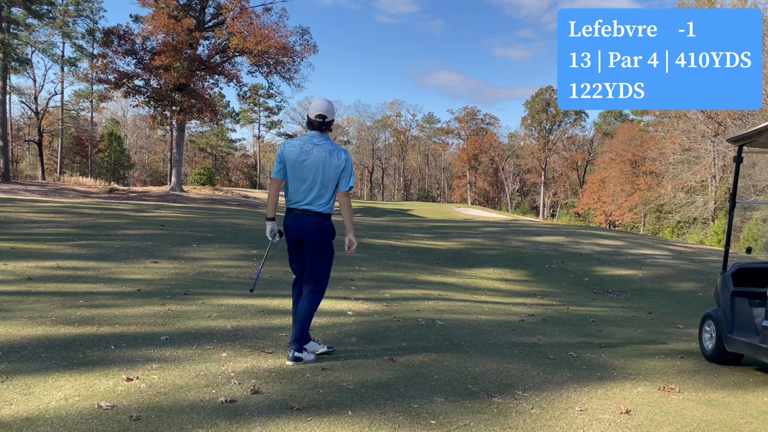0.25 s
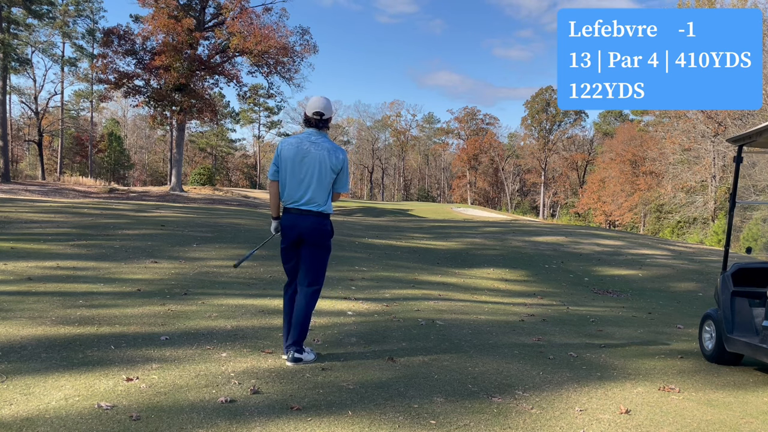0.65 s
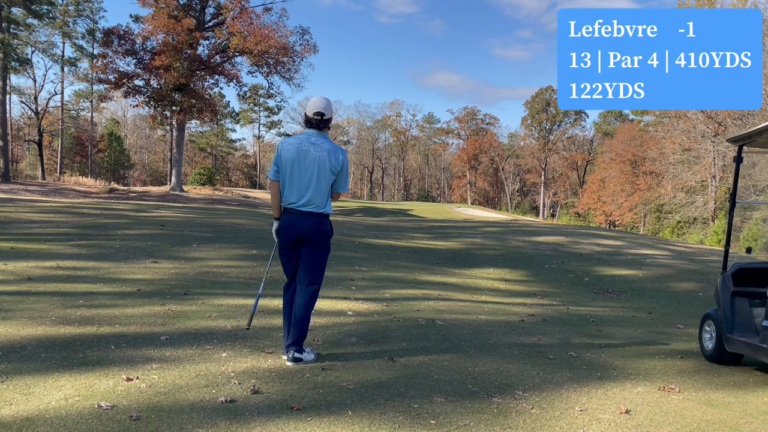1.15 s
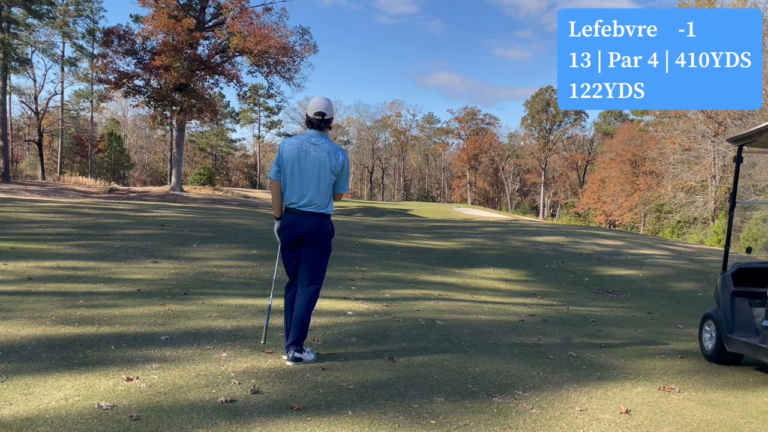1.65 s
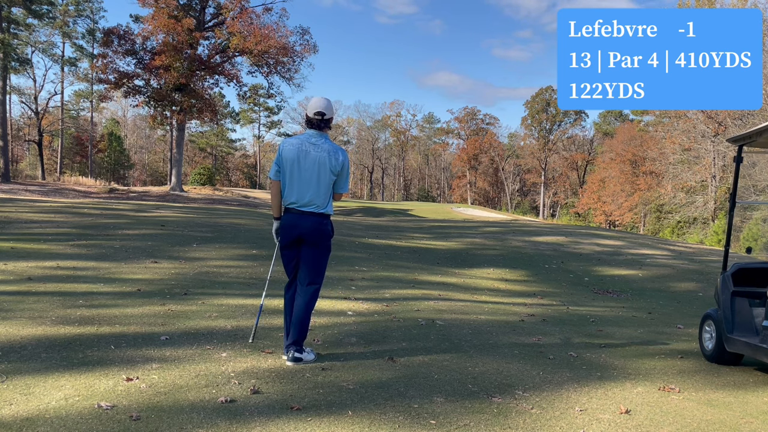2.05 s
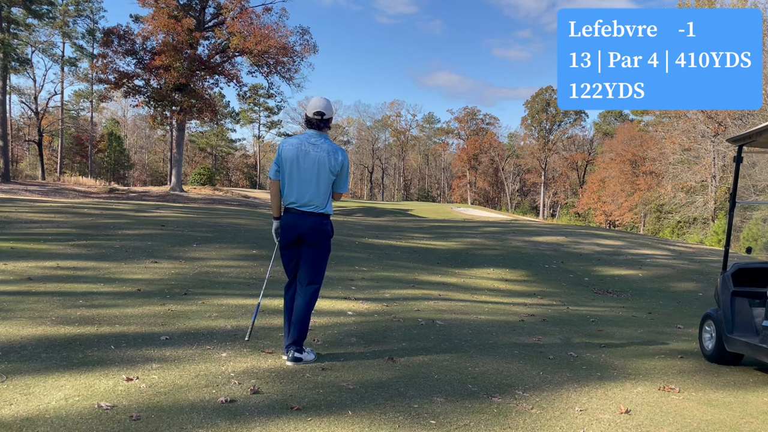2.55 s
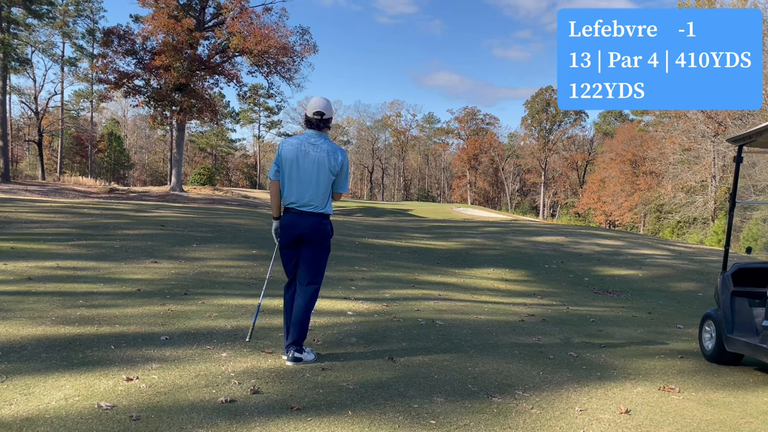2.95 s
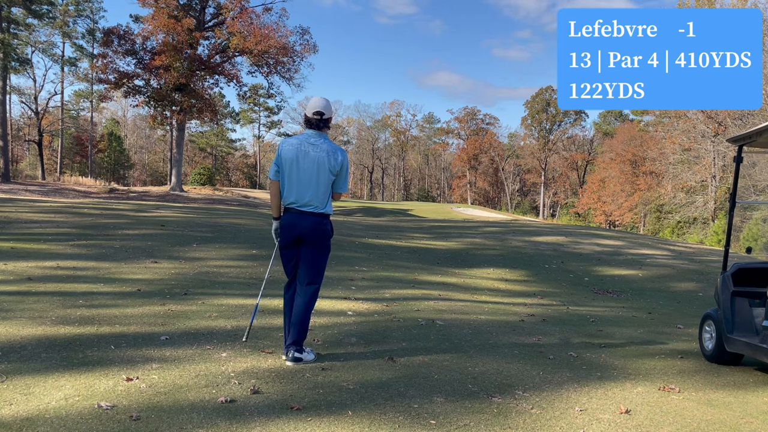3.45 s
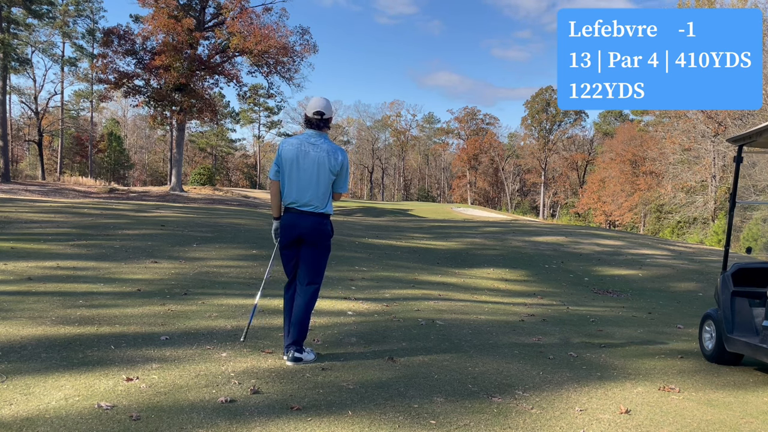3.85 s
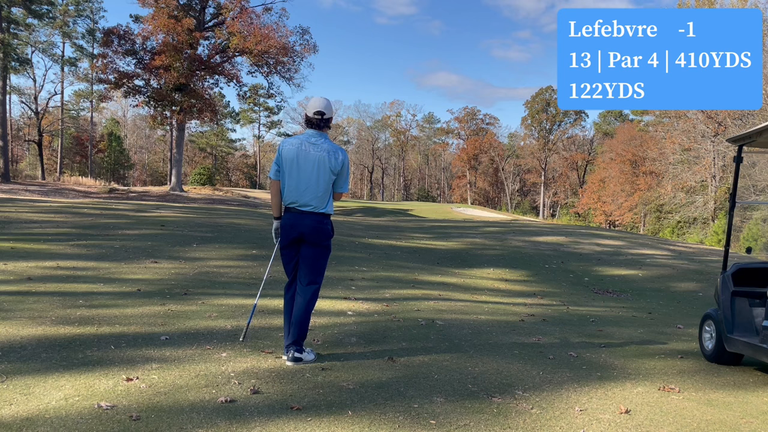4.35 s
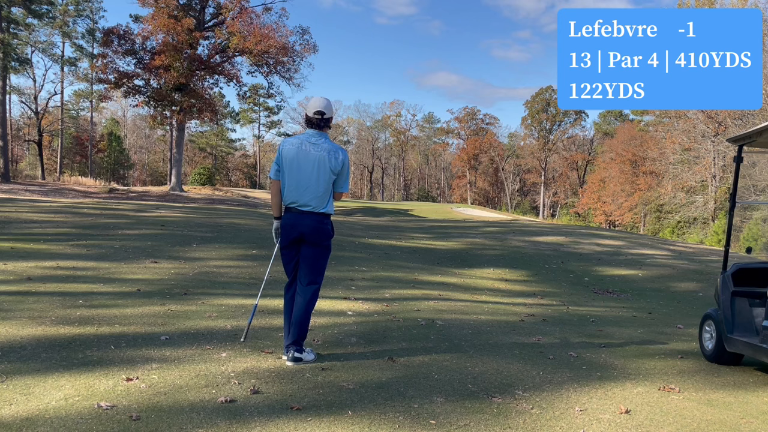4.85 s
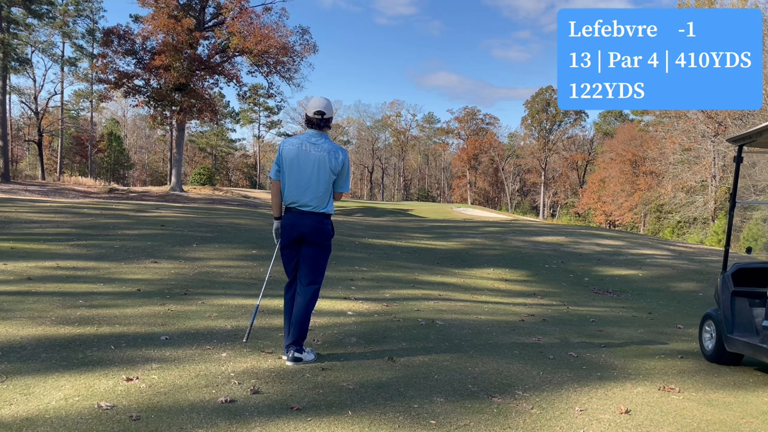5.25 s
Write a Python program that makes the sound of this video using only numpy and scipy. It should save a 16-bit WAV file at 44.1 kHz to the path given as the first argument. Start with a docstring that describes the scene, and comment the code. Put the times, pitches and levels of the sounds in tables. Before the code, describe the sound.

On an open lawn edged by trees, a faint swish and a quick crunch of dry leaves come first, with a short low trill. High songbird calls follow, one loud near the start. A small engine putters throughout, sagging slightly, then gaining speed with rattles and hard ticks. Soft low wind rumble and distant murmur lie beneath. A stereo microphone hears it from some distance, with no club strike.

```python
"""A small engine drones across an open lawn: pulse multiples plus running noise, over far murmur, rumble and wind.
A thin swish, then crunches in dry leaves (noise bursts) and a short low trill (double blips) open the scene.
From 0.7 s songbirds in the trees give thin high calls (gliding near-sines with a soft echo), a loud one near 0.9 s.
The engine sags a little, then gains speed; loose parts buzz (shaken resonances), with hard ticks from 1.55 s.
Two more loud bird calls come near 4 s, and the engine ends at its fastest."""
import sys
import numpy as np
from scipy import signal
from scipy.fft import rfft, irfft
from scipy.io import wavfile
from scipy.ndimage import uniform_filter1d

SR = 44100
rng = np.random.default_rng(int(sys.argv[2]) if len(sys.argv) > 2 else 0)


def file_out(sig):
    """Save sig as 16-bit WAV at sys.argv[1]."""
    # one column per channel
    cols = np.atleast_2d(sig).T
    # limit, then scale
    lim = np.clip(cols, -1, 1)
    pcm = np.round(lim * 32767).astype(np.int16)
    wavfile.write(sys.argv[1], SR, pcm)


N = 242991

# engine speed: time_s, firings_per_s
ENGINE_SPEED = [(0.0, 30.31), (0.3, 29.58), (0.6, 30.06), (0.85, 28.98), (1.05, 29.73), (1.3, 29.39),
                (1.55, 30.49), (1.8, 31.71), (2.05, 32.53), (2.4, 32.7), (2.8, 33.24), (3.2, 33.15),
                (3.6, 33.82), (4.0, 33.97), (4.4, 34.87), (4.75, 35.13), (5.1, 36.21), (5.51, 37.73)]


def engine_firings():
    """Firing phase in turns, integrated from the firing rate; the hardest tick falls on a firing."""
    firings_per_s, = in_time(ENGINE_SPEED)
    turns = np.cumsum(firings_per_s) / SR
    hardest_s = max(KNOCKS, key=lambda row: row[1])[0]
    return turns - turns[round(hardest_s * SR)], firings_per_s


# drone before exhaust gain: time_s, level_db (at multiple 2), slope_db_per_octave
DRONE_LEVEL = [(0, -52, 2), (.4, -51.5, 0), (.75, -53, 2.5), (.93, -48, -1), (1.4, -44, -4),
               (1.67, -41, -8), (2.0, -42.5, -5.5), (2.13, -44, -3), (2.35, -42.5, -4), (2.7, -42.5, -4),
               (3.4, -42, -6), (4.0, -46, 0.5), (4.4, -45.5, -2), (5.0, -45.5, -2.5), (5.51, -46.5, -6)]
# exhaust gain on multiples 1-6: pitch_hz, gain_db
EXHAUST_GAIN = [(29, -31.5), (33, -31.5), (38, -10), (55, 1.5), (75, 2.5), (90, -1), (102, 0.5),
                (112, -2.5), (125, -1.5), (138, 0.5), (154, -2.5), (164, -19.5), (172, -11.5), (182, -19),
                (200, -29.5), (225, -17)]
# weak upper multiples: multiple, level_db
WEAK_MULTIPLES = [(7, -78), (8, -76.5), (10, -74.5)]
PULSE_LEAD_TURNS = .056   # pulse ahead of rattle
HUNTING_TURNS = .006   # spread of early or late firing
PULSE_SPREAD_RAD = .55   # lag of multiple k, times k squared


def drone(turns, firings_per_s):
    """Low multiples of the firing rate locked into one pulse, each wavering on its way through the air."""
    level_db, slope_db = in_time(DRONE_LEVEL)
    multiples = [(k, level_db + slope_db * np.log2(k / 2) + at_hz(EXHAUST_GAIN, k * firings_per_s))
                 for k in range(1, 7)]
    turns = turns + PULSE_LEAD_TURNS + HUNTING_TURNS * drift(12.0)
    out = np.zeros(N)
    for k, multiple_db in multiples + WEAK_MULTIPLES:
        gain = np.sqrt(2) * from_db(multiple_db + .7 * drift(6.2))   # sqrt 2: rms to peak
        phase_rad = 2 * np.pi * k * turns - PULSE_SPREAD_RAD * k ** 2 + 0.054 * drift(7.0)
        out -= gain * np.cos(phase_rad)
    return out


# running noise over the lawn: time_s, level_db
RUNNING_LEVEL = [(0, -68.5), (.55, -64.5), (.8, -67.5), (1.4, -65), (1.7, -62), (3.1, -60.5), (4.9, -60),
                 (5.51, -62)]
# its spectrum: freq_hz, relative_db_per_hz
RUNNING_COLOUR = [(240, -36.5), (400, -10), (502, -8), (729, 3), (1110, -1.5), (1340, 0), (2040, -4),
                  (3180, -9.5), (5010, -22.5), (5610, -33.5), (6000, -42.5), (7800, -60.5), (13200, -120)]


def rush(turns, rush_db):
    """Broad running noise that swells a little with each firing."""
    throb = 1 + 0.055 * np.cos(2 * np.pi * turns)
    return from_db(rush_db + .5 * drift(15)) * throb * coloured(RUNNING_COLOUR)


# level of each part at rest, relative to running noise: part -> relative_db
REST_DB = {"low": -21, "middle": -17, "high": -23, "top": -34}
# spells of harder rattle: part, middle_s, length_s, peak_level_db
RATTLE_SPELLS = [("low", 2.4, 0.83, -76.5), ("low", 4.4, 0.093, -69), ("low", 3.79, 0.23, -66.5),
                 ("low", 4.7, 1.0, -73.5), ("middle", 1.81, 1, -73), ("middle", 3.26, 0.38, -67.5),
                 ("middle", 3.74, 1, -72), ("high", 1.4, 0.24, -77.5), ("high", 2.805, 0.47, -72.5),
                 ("top", 1.9, .1, -87), ("top", 2.7, .2, -84.5), ("top", 3.5, 0.91, -88)]


def rattle_db(part, rush_db):
    """A loose part buzzes with the running noise and harder in its spells; powers add."""
    power = from_db(rush_db + REST_DB[part]) ** 2
    for name, middle_s, length_s, peak_db in RATTLE_SPELLS:
        if name == part:
            power = power + (from_db(peak_db) * hump(middle_s, length_s)) ** 2
    return 10 * np.log10(power)


def shaken(turns, modes, level_db):
    """Noise in a pipe or loose part, harder just after each firing: strong then weak, never alike."""
    firing = np.floor(turns).astype(int) - int(np.floor(turns[0]))
    chance = np.minimum(rng.standard_normal(400), 1)[firing]
    strength = from_db(2.5 * (-1) ** firing + 3.7 * chance)
    shake = .28 + 0.61 * strength * np.exp(-(turns % 1) / .18)
    buzz = np.zeros(N)
    for pitch_hz, width_hz in modes:
        ring = resonate(shake * rng.standard_normal(N), pitch_hz, width_hz)
        buzz += rms_one(ring) * from_db(3.3 * drift(8))
    return from_db(level_db) * rms_one(buzz)


# exhaust pipe resonances: pitch_hz, width_hz
PIPE_MODES = [(734.6, 39), (376.4, 84)]
# loose-part resonances, low to top: pitch_hz, width_hz
LOW_MODES = [(2200, 550), (2650, 500)]
MIDDLE_MODES = [(3150, 330), (3450, 420)]
HIGH_MODES = [(4050, 400), (4350, 440)]
TOP_MODES = [(5100, 260), (5900, 290)]
PIPE_REL_DB, PIPE_FOLLOWS = -7.5, 2.3   # re mean running noise; multiple of its swing


def pipe_and_rattles(turns, rush_db):
    """Exhaust pipe and four loose parts, all shaken by the firings."""
    mean_db = rush_db.mean()
    out = shaken(turns, PIPE_MODES, mean_db + PIPE_REL_DB + PIPE_FOLLOWS * (rush_db - mean_db))
    for part, modes in [("low", LOW_MODES), ("middle", MIDDLE_MODES), ("high", HIGH_MODES), ("top", TOP_MODES)]:
        out = out + shaken(turns, modes, rattle_db(part, rush_db))
    return out


# hardest ticks of the loose parts: start_s, peak_db, pitch_hz
KNOCKS = [(1.553, -62, 3140), (1.6188, -60, 3100), (1.6837, -59, 3130), (1.7455, -63, 3240),
          (1.8408, -59, 2520), (1.8733, -60, 2540), (1.9037, -62, 3450), (1.9356, -57, 3240),
          (1.9965, -56, 3250), (2.1511, -59, 2740), (2.2434, -59, 3110), (2.4255, -62, 2610),
          (2.4864, -59, 2500), (2.5198, -53.5, 2290), (2.7303, -57, 2470), (2.7907, -58, 4220),
          (2.8171, -56.5, 2500), (2.8835, -51, 2100), (2.9408, -55.5, 2540), (2.9997, -61, 2980),
          (3.0321, -58, 3380), (3.1504, -59, 3170), (3.1803, -58, 3380), (3.2107, -50.5, 3170),
          (3.2711, -59, 3190), (3.301, -60.5, 3110), (3.3609, -58, 2860), (3.3908, -57, 3260),
          (3.4801, -61, 2620), (3.5689, -55, 3170), (3.5973, -57, 2700), (3.6283, -58, 3400),
          (3.6567, -61, 3380), (3.6866, -55, 2710), (3.7176, -57, 2370), (3.7465, -60, 2650),
          (3.7764, -55, 2380), (3.8358, -59, 2760), (3.8652, -56, 2420), (4.0124, -55.5, 2160),
          (4.0448, -56, 2910), (4.2743, -60, 2790), (4.4758, -60, 2940), (4.5058, -57.5, 2900),
          (4.5921, -61, 2930), (4.647, -57, 2290), (2.945, -71, 5900), (3.003, -70, 5900),
          (4.026, -66, 5900), (4.027, -60, 5150), (5.401, -66, 5200), (4.133, -58.5, 4150),
          (5.4, -68, 6160)]
TICK_WIDTH, TICK_PARTNER = .065, 1.1   # width / pitch; pitch ratio of second mode


def hard_ticks():
    """Single knocks ringing briefly at their own pitch and in a second mode of chance strength."""
    out, knock = np.zeros(N + SR), signal.unit_impulse(600)
    chance = rng.standard_normal((len(KNOCKS), 2))
    for (start_s, peak_db, pitch_hz), (share, side) in zip(KNOCKS, chance):
        width_hz = TICK_WIDTH * pitch_hz
        partner_hz = pitch_hz * TICK_PARTNER ** np.sign(side)
        ring = resonate(knock, pitch_hz, width_hz)
        ring = ring + from_db(-5 + 2 * share) * resonate(knock, partner_hz, width_hz)
        first = round(start_s * SR)
        out[first:first + len(ring)] += from_db(peak_db) * ring / np.abs(ring).max()
    return out[:N]


ATTACK_S, RELEASE_S = 0.0054, 0.0023


def note(start_s, pitch_hz, level_db, quaver_hz):
    """One near-sine along a pitch path."""
    out, first, t = np.zeros(N), round(start_s * SR), np.arange(len(pitch_hz)) / SR
    edge = np.clip(np.minimum(t / ATTACK_S, (t[-1] - t) / RELEASE_S), 0, 1)
    unsteady_hz = pitch_hz + quaver_hz[first:first + len(t)]
    tone = np.sin(2 * np.pi * np.cumsum(unsteady_hz) / SR)
    out[first:first + len(t)] = edge * from_db(level_db) * tone
    return out


# bird levels in these tables are before flutter and pan
# glides that slow toward their end: start_s, length_s, from_hz, to_hz, level_db
BIRD_GLIDES = [(0.677, 0.08, 6450, 7330, -83.5), (.75, 0.085, 7400, 7950, -83.5),
               (.84, .03, 7880, 7800, -84.5), (0.805, 0.12, 6520, 7130, -88),
               (0.888, 0.029, 7200, 7400, -77), (0.948, 0.054, 7580, 7700, -81),
               (0.996, 0.028, 7950, 8500, -85), (1.037, 0.083, 6400, 7250, -78.5),
               (1.177, 0.013, 7300, 5200, -74), (1.185, 0.036, 6500, 6970, -80.5),
               (1.196, 0.071, 7250, 7330, -88), (1.836, 0.02, 8450, 7700, -77.5),
               (2.487, 0.025, 7500, 6750, -73), (2.502, 0.031, 6720, 7450, -79),
               (2.475, .03, 8200, 7950, -85), (2.892, 0.021, 6700, 6550, -87),
               (2.905, .03, 7200, 6950, -85.5), (3.575, 0.031, 7000, 7800, -89),
               (3.621, 0.028, 6800, 6800, -78.5), (4.21, 0.038, 7850, 7860, -80.5),
               (4.265, 0.04, 7950, 7900, -81), (4.718, 0.09, 7880, 7940, -81.5),
               (4.972, 0.076, 8050, 7750, -81.5), (5.136, 0.025, 6500, 7500, -78)]
# hooks that bend to a turn, then break away:
# start_s, before_turn_s, after_turn_s, from_hz, turn_hz, end_hz, start_level_db, turn_level_db
BIRD_HOOKS = [(1.115, 0.049, .03, 7700, 8100, 7600, -86, -83),
              (3.716, 0.028, .03, 6300, 7170, 5800, -91, -82),
              (4.765, .105, 0.046, 7880, 8030, 7600, -93, -79.5),
              (5.035, 0.026, 0.078, 7850, 8040, 7830, -90, -79.5)]
# three loud calls that climb and plunge, one list each: time_s, pitch_hz
LOUD_CALL_PITCH = [
    [(.864, 6200), (.878, 6480), (.9, 6700), (.915, 7060), (.926, 7080), (.94, 6700), (.947, 6100),
     (.953, 4500)],
    [(3.998, 6300), (4.012, 6600), (4.028, 6750), (4.045, 7150), (4.1, 7560), (4.147, 7890), (4.153, 7500),
     (4.159, 6600)],
    [(4.217, 5950), (4.232, 6250), (4.258, 6480), (4.278, 6990), (4.312, 7170), (4.328, 6880),
     (4.335, 6000), (4.343, 4800)],
]
# their levels: time_s, level_db
LOUD_CALL_LEVEL = [
    [(.864, -81), (.885, -60.5), (.905, -66), (.925, -60.5), (.943, -61), (.953, -84)],
    [(3.998, -80), (4.03, -69), (4.08, -73.5), (4.145, -70), (4.153, -82), (4.159, -89)],
    [(4.217, -82), (4.235, -71), (4.255, -73), (4.275, -68.5), (4.335, -65), (4.343, -74)],
]
GLIDE_EASE, BREAK_POWER = 1.6, 3.6   # exponents of the pitch laws
BREAK_FADE_DB = -6   # a hook weakens as it breaks away
QUAVER_HZ, BIRD_PAN_DB = 30, 9.5   # spread of pitch (half in loud calls); left over right
ECHO_DB, ECHO_RISE_S, ECHO_T60_S = -32, .012, .26


def birds():
    """Gliding, fluttering near-sines; the trunks answer softly and a little late with a blurred echo."""
    song, quaver_hz = np.zeros(N), QUAVER_HZ * drift(55)
    for start_s, length_s, from_hz, to_hz, level_db in BIRD_GLIDES:
        left = np.linspace(1, 0, round(length_s * SR))
        song += note(start_s, to_hz + (from_hz - to_hz) * left ** GLIDE_EASE, level_db, quaver_hz)
    for start_s, before_s, after_s, from_hz, turn_hz, end_hz, start_db, turn_db in BIRD_HOOKS:
        bend = np.cos(np.linspace(0, np.pi / 2, round(before_s * SR))) ** 2
        away = np.linspace(0, 1, round(after_s * SR)) ** BREAK_POWER
        pitch_hz = turn_hz + np.r_[(from_hz - turn_hz) * bend, (end_hz - turn_hz) * away]
        level_db = turn_db + np.r_[(start_db - turn_db) * bend, BREAK_FADE_DB * away]
        song += note(start_s, pitch_hz, level_db, quaver_hz)
    for pitch, level in zip(LOUD_CALL_PITCH, LOUD_CALL_LEVEL):
        t = np.arange(pitch[0][0], pitch[-1][0], 1 / SR)
        pitch_hz = uniform_filter1d(np.interp(t, *np.transpose(pitch)), size=200, mode="nearest")
        song += note(t[0], pitch_hz, np.interp(t, *np.transpose(level)), quaver_hz / 2)
    flutter = from_db(2.4 * drift(79))
    panned = song * flutter * from_db([[BIRD_PAN_DB / 2], [-BIRD_PAN_DB / 2]])
    age_s = np.arange(SR // 2) / SR
    decay = from_db(-60 * age_s / ECHO_T60_S) * np.minimum(age_s / ECHO_RISE_S, 1)
    tail = rng.standard_normal((2, SR // 2)) * decay
    echo = signal.fftconvolve(panned, tail, axes=1)[:, :N]
    return left_first(panned) + from_db(ECHO_DB + 2.4 * drift(150)) * echo


# double notes, level before the husky noise: start_s, level_db
TRILL_NOTES = [(0.42, -57), (0.4795, -59.5), (0.5392, -60.5), (0.6018, -62)]
TRILL_ROUGH, TRILL_TAIL_DB = .9, -4   # share of husky noise; blur after each note


def trill():
    """Each double note is a husky high blip, then a lower one that bends upward, blurred after."""
    out, t = np.zeros(N), np.arange(round(0.03 * SR)) / SR
    high = 0.57 * np.sin(2 * np.pi * 2500 * t) * np.exp(-((t - .004) / 0.0033) ** 2)
    low_hz = 1700 + 30000 * t
    low = np.sin(2 * np.pi * np.cumsum(low_hz) / SR) * np.exp(-((t - .011) / 0.0046) ** 2)
    for start_s, level_db in TRILL_NOTES:
        first = round(start_s * SR)
        out[first:first + len(t)] += from_db(level_db) * (high + low)
    out = out * (1 + TRILL_ROUGH * drift(170))
    blur = rng.standard_normal(4000) * from_db(-60 * np.arange(4000) / SR / .09)   # T60 0.09 s
    return out + from_db(TRILL_TAIL_DB) * signal.fftconvolve(out, blur / np.linalg.norm(blur))[:N]


# crunches in dry leaves, envelope before the noise gains: start_s, envelope_peak_db, rise_s
LEAF_CRUNCHES = [(.3125, -57, 0.0009), (0.401, -48, 0.0022), (0.404, -43, 0.002), (0.413, -51, 0.0018),
                 (.421, -51, 0.0019), (.433, -58, 0.0023), (0.447, -54, 0.001), (.478, -62, .003),
                 (0.4883, -48, 0.00077)]
# crunch spectrum: freq_hz, relative_db_per_hz
LEAF_COLOUR = [(500, -26), (1200, -10), (2400, -4), (3300, -2), (4400, -23), (5250, 4), (5800, -4),
               (6500, -13), (7500, -4), (8600, 14), (10000, 0), (11500, -6.5), (14000, 1), (15700, -2)]
# each port's own share: freq_hz, relative_db_per_hz
LEAF_SCATTER = [(500, -24), (2400, -7), (6500, -9), (10000, -2), (11800, -14), (12600, -50)]
SCATTER_DB = -10   # before a further 0.31 gain
SETTLE_DB, SETTLE_T60_S = -39, 0.25   # rustle re crunch envelope
SWISH_MIDDLE_S, SWISH_LENGTH_S, SWISH_DB = .09, .2, -83.5


def leaves():
    """Each crunch is a burst of bright noise; a thin rustle lingers, and a thin swish comes first."""
    t = np.arange(N) / SR
    rustle = from_db(SWISH_DB) * hump(SWISH_MIDDLE_S, SWISH_LENGTH_S)
    for start_s, peak_db, rise_s in LEAF_CRUNCHES:
        settle_db = peak_db + SETTLE_DB - 60 * np.maximum(t - start_s, 0) / SETTLE_T60_S
        rustle = rustle + (t > start_s) * from_db(settle_db)
    thin = coloured([(8000, -41.5), (11000, -10), (13500, -4.5), (15500, -17)])
    crackle = bursts(LEAF_CRUNCHES)
    crunch = crackle * ragged(coloured(LEAF_COLOUR)) * 0.52
    sound = crunch + rustle * from_db(0.6 * drift(44)) * thin
    scatter = np.array([coloured(LEAF_SCATTER) for port in range(2)])
    return left_first([sound, sound]) + from_db(SCATTER_DB) * crackle * scatter * 0.31


def bursts(rows):
    """Envelope of bursts that swell fast and die."""
    t, out = np.arange(N) / SR, np.zeros(N)
    for start_s, peak_db, rise_s in rows:
        age = np.maximum(t - start_s, 0) / max(rise_s, .0003)
        out += from_db(peak_db) * age * np.exp(1 - age)
    return out


CRACKLE_DB = 3.5   # spread of unevenness, band by band


def ragged(x):
    """Each band of a sound flickers on its own."""
    edges_hz = [300, 2000, 4000, 6000, 8000, 11000, 13500, 17000]
    out = np.zeros(N)
    for band_hz in zip(edges_hz, edges_hz[1:]):
        band_pass = signal.butter(2, band_hz, "band", fs=SR, output="sos")
        out += from_db(CRACKLE_DB * drift(150)) * signal.sosfilt(band_pass, x)
    return out


# wind spectrum: freq_hz, relative_db_per_hz
WIND_COLOUR = [(15, -26.5), (35, -5.5), (60, 6.5), (90, -2), (150, -13.5), (400, -100)]
WIND_DB = -59   # before gusts and lumps


def wind():
    """Lumpy low pressure: gusts in common, lumps and noise each port's own."""
    gusts_db = 1.5 * drift(2)
    lumps_db = [1.5 * drift(5) for port in range(2)]
    return np.array([from_db(WIND_DB + gusts_db + own_db) * coloured(WIND_COLOUR) for own_db in lumps_db])


# spectra: freq_hz, relative_db_per_hz
RUMBLE_COLOUR = [(12, -19), (25, -2.5), (50, 6), (85, 10), (150, 2.5), (200, -1), (330, -8), (450, -24),
                 (700, -52.5), (3000, -110)]
FAR_COLOUR = [(250, -26.5), (420, -1), (620, -1.5), (900, -9), (1300, -1), (1700, -9), (2500, -39),
              (5000, -100)]
AIR_COLOUR = [(2650, -27.5), (4500, -10.5), (5050, 0), (5610, -10.5), (6100, -6), (6840, -11), (7550, -14),
              (8260, -6.5), (10100, -17), (12200, -18), (14000, -34.5), (15700, -28.5)]
RUMBLE_DB, FAR_DB, AIR_DB = -51, -67.5, -84


def rumble():
    """Steady low noise."""
    return from_db(RUMBLE_DB) * coloured(RUMBLE_COLOUR)


def far_murmur():
    """Steady far murmur of the landscape, as coloured noise."""
    return from_db(FAR_DB) * coloured(FAR_COLOUR)


def air_hiss():
    """Faint steady hiss of the air."""
    return from_db(AIR_DB) * coloured(AIR_COLOUR)


# likeness of the two microphone ports: freq_hz, shared_power_share
PORT_LIKENESS = [(150, 1), (300, .8), (600, .45), (1200, .75), (2300, .5), (3300, .38), (5000, .6),
                 (9000, .7), (13000, .8)]
# level difference: freq_hz, left_minus_right_db
PORT_TILT = [(60, -4.5), (130, -4.5), (290, -1), (640, 2.0), (1410, 0.5), (3100, 0), (6820, 5), (15000, -2)]


def ports(direct, scattered):
    """Part of a far sound is shared by both ports, the scattered part is each port's own."""
    hz = np.arange(N // 2 + 1) * SR / N
    alike = np.clip(at_hz(PORT_LIKENESS, hz), 0, 1)
    shared = np.sqrt(alike) * rfft(direct)
    pair = [irfft(shared + np.sqrt(1 - alike) * rfft(own), N) for own in scattered]
    return left_first(pair, at_hz(PORT_TILT, hz))


# phase between ports: freq_hz, left_lead_rad
PORT_LEAD = [(0, 0), (950, 2.9), (1380, 3.0), (4130, 7.6), (5770, 9.6), (6980, 13.6), (7580, 10.4),
             (10200, 9.0), (11600, 7.4), (12100, 6.3), (15400, 6.2)]


def left_first(pair, tilt_db=0):
    """Sound reaches the left port first: phase and level differences split over both ports."""
    hz = np.arange(N // 2 + 1) * SR / N
    half = from_db(tilt_db / 2) * np.exp(.5j * np.interp(hz, *np.transpose(PORT_LEAD)))
    return np.array([irfft(rfft(pair[0]) * half, N), irfft(rfft(pair[1]) / half, N)])


def from_db(db):
    """Decibels to gain."""
    return 10 ** (np.asarray(db) / 20)


def rms_one(x):
    """Scaled to rms 1."""
    return x / np.sqrt(np.mean(x ** 2) + 1e-20)


def in_time(rows):
    """Curve columns at every sample."""
    time_s, *columns = np.transpose(rows)
    return [np.interp(np.arange(N) / SR, time_s, column) for column in columns]


def at_hz(points, hz):
    """A spectrum read on a log-frequency axis."""
    points_hz, values = np.transpose(points)
    return np.interp(np.log(hz + 1), np.log(points_hz + 1), values)


def drift(rate_hz):
    """Slow chance of spread 1: two-pole low-passed noise, one value per 40 samples, interpolated."""
    r = np.exp(-80 * np.pi * rate_hz / SR)
    slow = signal.lfilter([1], [1, -2 * r, r * r], rng.standard_normal(N // 40 + 2002))[2000:]
    return np.interp(np.arange(N) / 40, np.arange(len(slow)), rms_one(slow))


def coloured(spectrum):
    """Noise with a spectrum; rms 1."""
    hz = np.arange(N // 2 + 1) * SR / N
    return rms_one(irfft(rfft(rng.standard_normal(N)) * from_db(at_hz(spectrum, hz)), N))


def resonate(x, hz, width_hz):
    """A resonance passed twice, so that its skirts are steep."""
    r = np.exp(-np.pi * width_hz / SR)
    a = [1, -2 * r * np.cos(2 * np.pi * hz / SR), r * r]
    once = signal.lfilter([(1 - r * r) / 2, 0, (r * r - 1) / 2], a, x)
    return signal.lfilter([1 - r], a, once)


def hump(middle_s, length_s):
    """A smooth swell of height 1."""
    return np.exp(-(2 * (np.arange(N) / SR - middle_s) / length_s) ** 2)


def scene():
    """Engine, ticks, birds, trill, leaves, wind and the steady background."""
    turns, firings_per_s = engine_firings()
    rush_db, = in_time(RUNNING_LEVEL)
    # one direct noise path, then one scattered path per port
    direct, *scattered = [rush(turns, rush_db) + pipe_and_rattles(turns, rush_db)
                          + far_murmur() + rumble() + air_hiss() for path in range(3)]
    far = ports(direct + drone(turns, firings_per_s) + trill(), scattered)
    ticks = hard_ticks()
    return far + left_first([ticks, ticks]) + birds() + leaves() + wind()


CUTOFF_HZ = 15850


def record(dry):
    """The top is cut by a steep low-pass."""
    low_pass = signal.ellip(12, .5, 70, CUTOFF_HZ, fs=SR, output="sos")
    return signal.sosfilt(low_pass, dry)


dry = scene()
out = record(dry)
file_out(out)
```